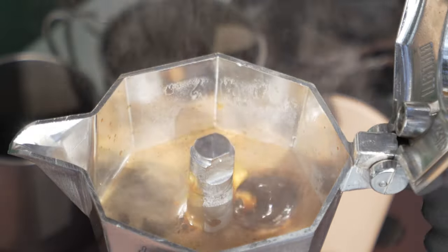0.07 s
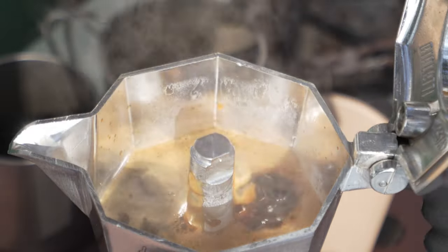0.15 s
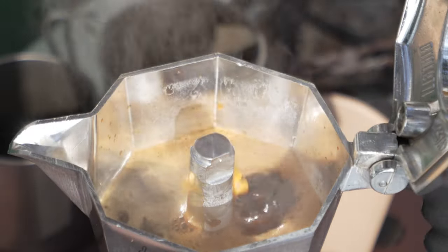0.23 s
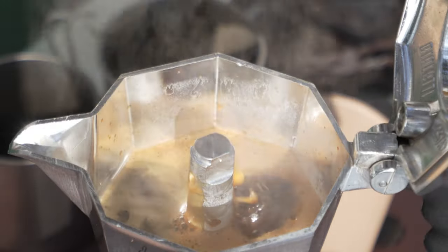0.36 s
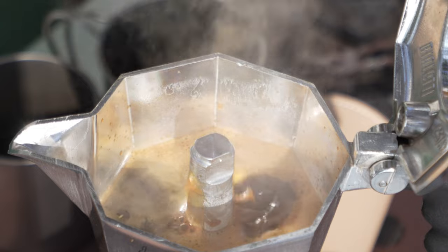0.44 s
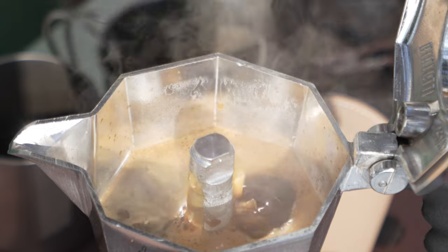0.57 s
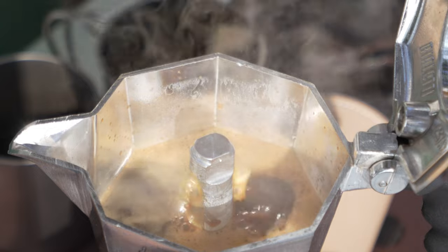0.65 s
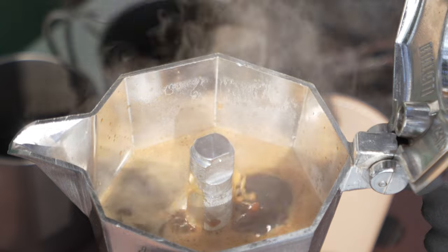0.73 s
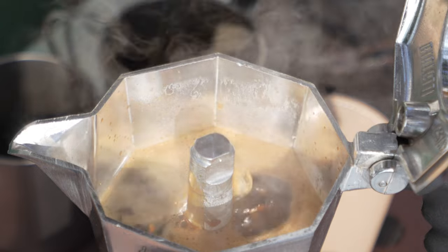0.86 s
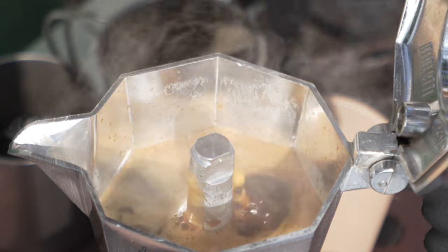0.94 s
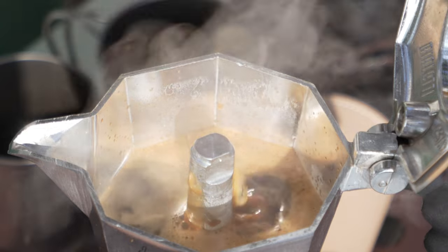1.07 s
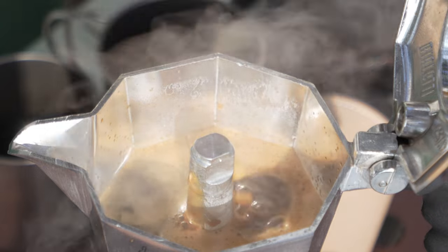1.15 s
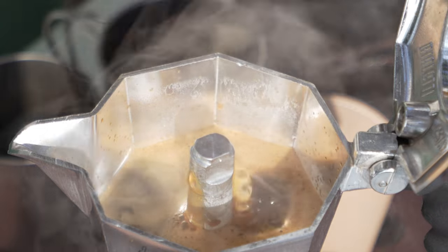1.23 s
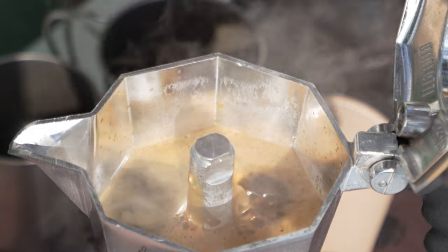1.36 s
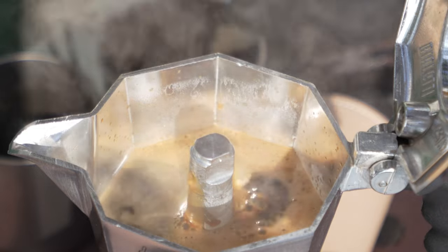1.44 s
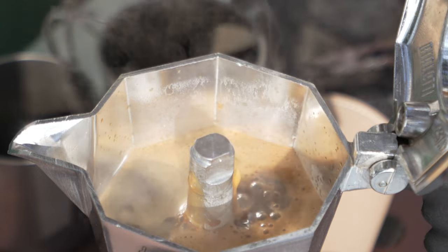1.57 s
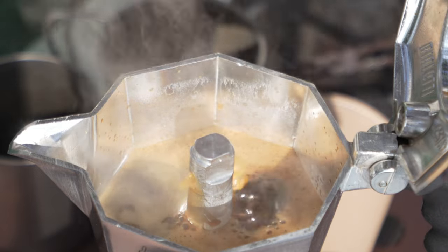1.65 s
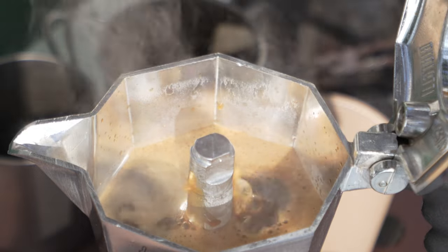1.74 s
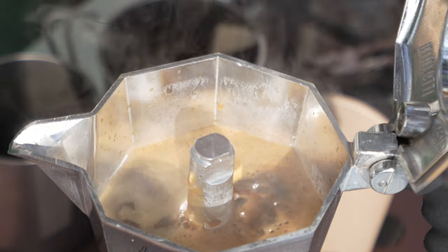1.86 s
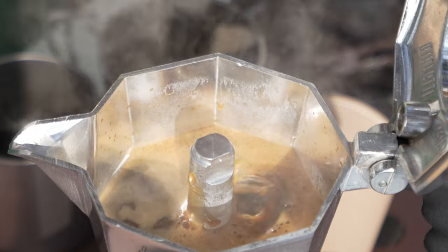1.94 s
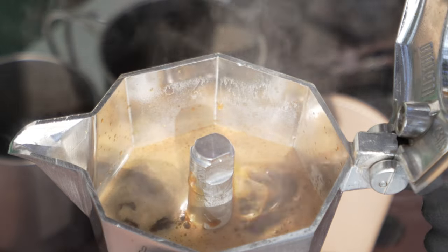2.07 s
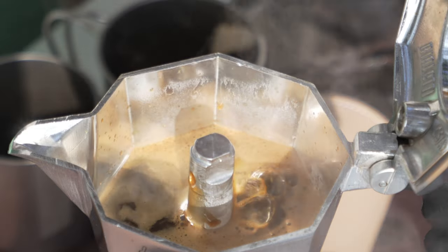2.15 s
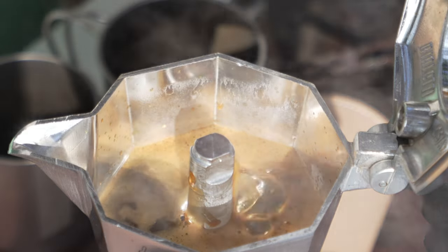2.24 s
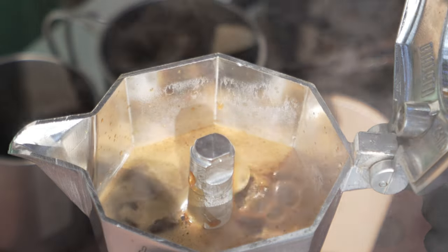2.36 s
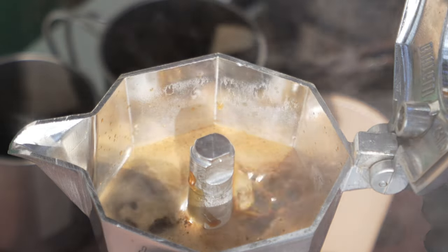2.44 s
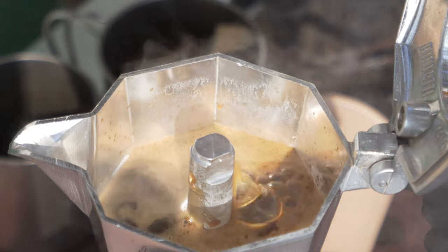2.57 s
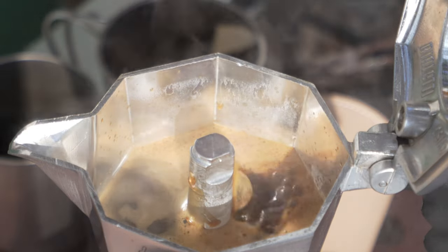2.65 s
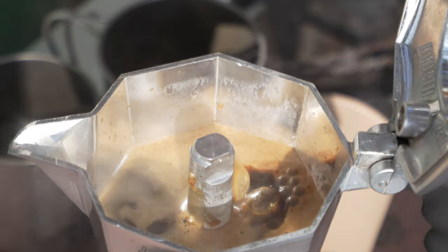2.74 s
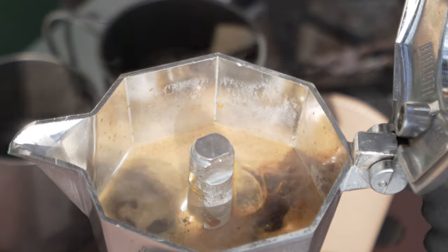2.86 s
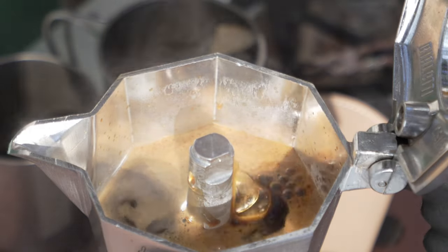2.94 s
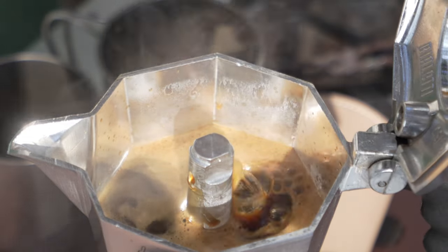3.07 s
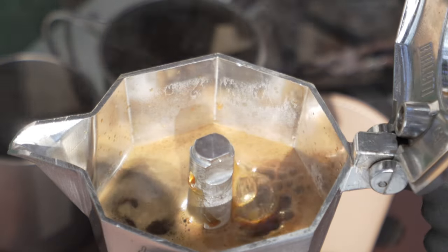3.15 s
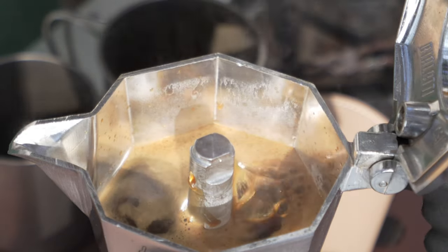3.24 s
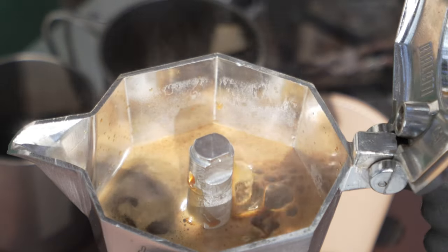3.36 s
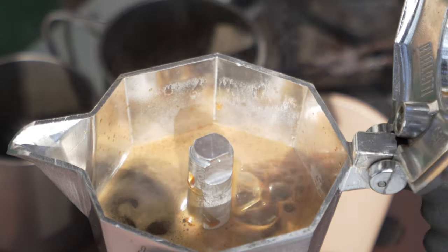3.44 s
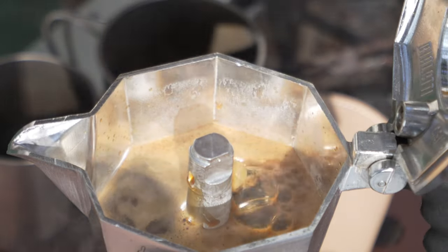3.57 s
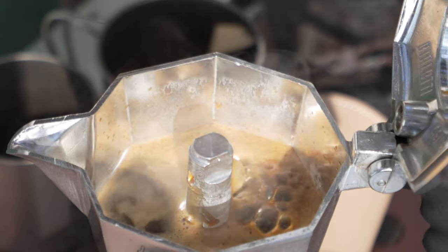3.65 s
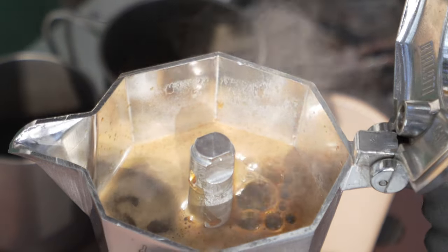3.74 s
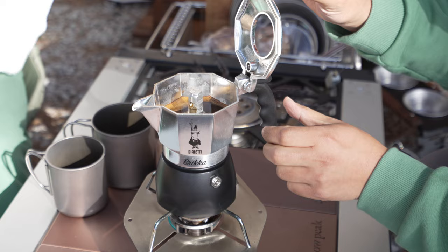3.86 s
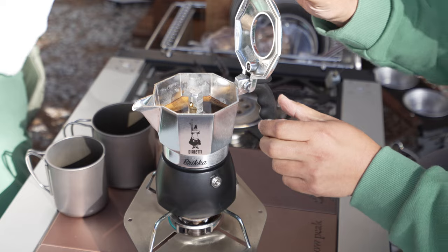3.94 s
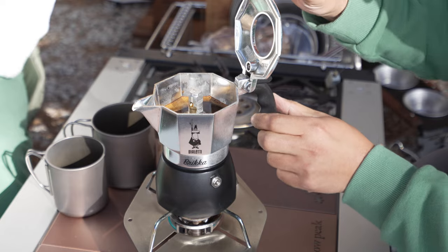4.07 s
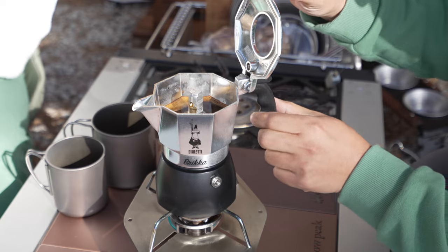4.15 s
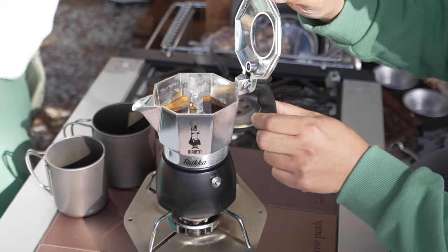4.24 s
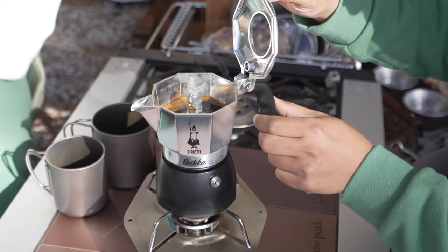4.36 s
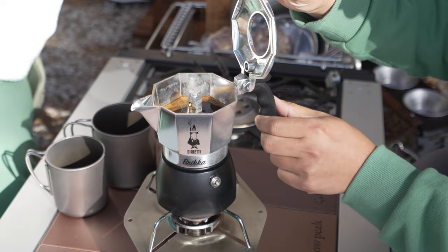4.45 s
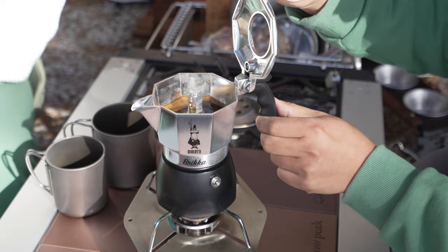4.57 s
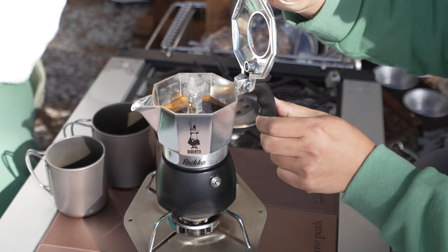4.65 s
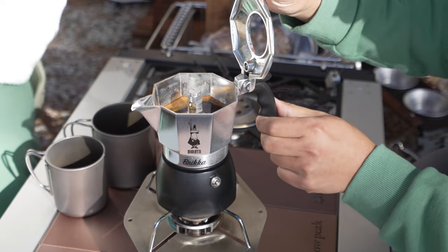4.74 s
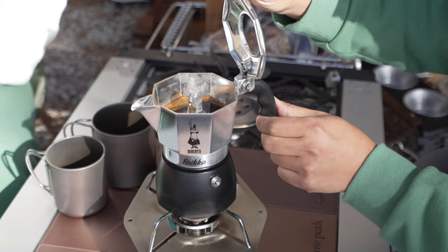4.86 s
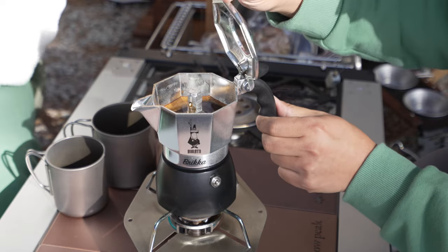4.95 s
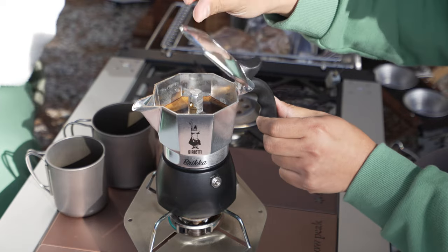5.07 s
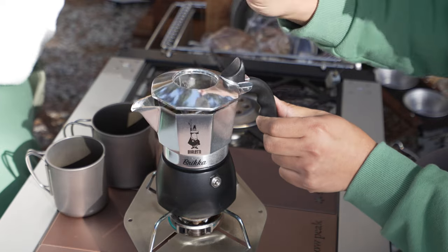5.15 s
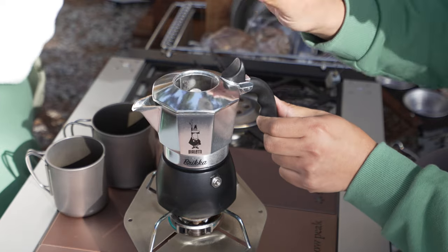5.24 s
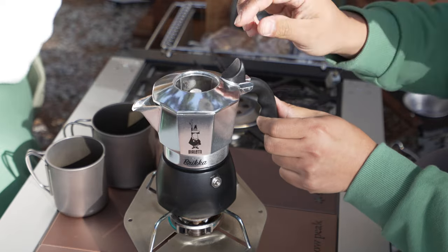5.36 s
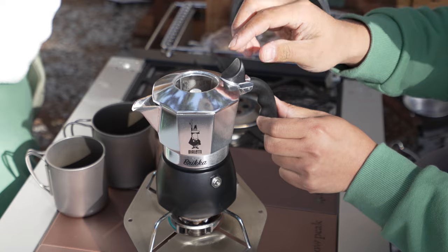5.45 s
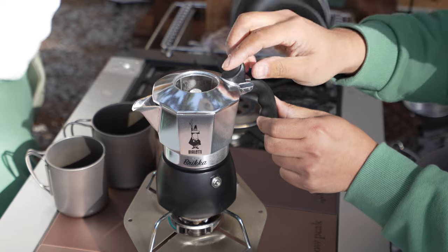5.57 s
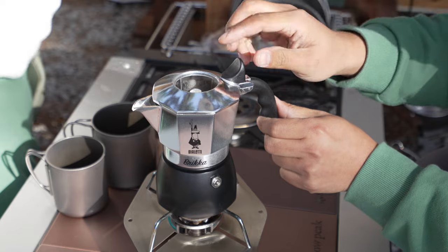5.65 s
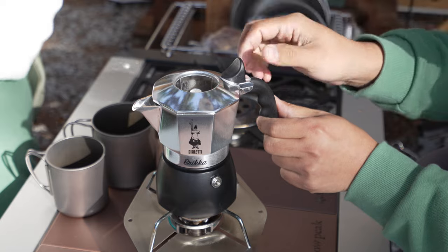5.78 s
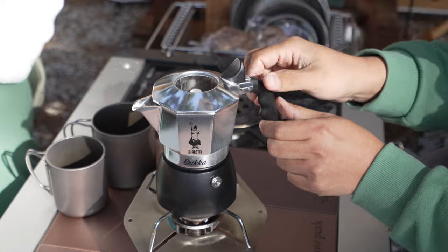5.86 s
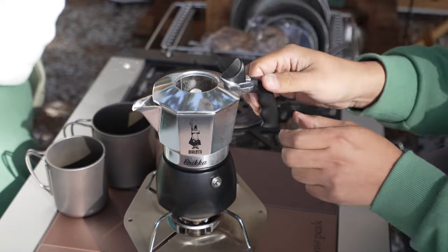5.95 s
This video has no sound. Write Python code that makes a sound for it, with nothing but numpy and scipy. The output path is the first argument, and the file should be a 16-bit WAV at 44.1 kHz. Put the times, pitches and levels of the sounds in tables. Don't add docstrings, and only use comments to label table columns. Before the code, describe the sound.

Close boiling pops and sputtering steam over soft burner roar and wind buffeting, ending with faint steam puffs, hinge ticks and a bright metallic lid clatter.

```python
import sys
import numpy as np
from scipy import signal
from scipy.io import wavfile
from scipy.ndimage import uniform_filter1d

SR = 44100
rng = np.random.default_rng(int(sys.argv[2]) if len(sys.argv) > 2 else 0)


def boost(x):
    u = np.asarray(x, float) / 20
    return 10 ** u


def transcribe(signal):
    frames = np.atleast_2d(signal).T
    limited = np.clip(frames, -1, 1)
    pcm = np.round(limited * 32767).astype(np.int16)
    wavfile.write(sys.argv[1], SR, pcm)


N = 265041

# f/Hz, level/dB per Hz
AIR_COLOUR = [(88, -47), (150, -3.5), (230, -6), (264, -6), (361, -10.5), (523, -7), (773, -9), (996, -9),
              (1210, -10.5), (1860, -15), (2400, -17.5), (3980, -19.5), (5330, -20.5), (6110, -29),
              (9000, -31), (15900, -45)]
# t/s, level/dB
AIR_LEVEL = [(0, -50.5), (3.9, -47.5), (3.92, -47.5), (5.1, -47.5), (5.5, -51.5), (6.01, -47.5)]

# t/s, level/dB
WIND_LEVEL = [(0.0, -44.5), (0.6, -44.5), (0.85, -35.5), (1.04, -44.5), (1.43, -32.5), (1.55, -53),
              (1.65, -38.5), (2.03, -34), (2.67, -50), (2.87, -34.5), (2.98, -49), (3.55, -46.5),
              (3.95, -35), (5.01, -35.5), (5.3, -61), (5.4, -34.5), (5.65, -50.5), (5.99, -43)]
# f/Hz, level/dB per Hz
WIND_COLOUR = [(8.8, -37), (15, 4), (43, 1), (70, 0), (110, -5.5), (221, -23.5), (350, -27), (460, -25),
               (770, -120)]
# t/s, peak/dB, f/Hz, length/ms
GUSTS = [(0.228, -19.5, 62.3, 15), (0.385, -24, 74, 16.4), (0.673, -20.5, 65, 29), (0.898, -27.5, 72, 30),
         (1.106, -27, 76, 16), (1.167, -22.5, 58.4, 28), (1.386, -20, 57.7, 8.8), (1.587, -27.5, 60, 29),
         (1.664, -14, 46, 5.4), (2.005, -19, 59.4, 68), (2.174, -31, 66, 19), (2.34, -27, 66.3, 16),
         (2.812, -26, 70.6, 23), (2.871, -21, 50.5, 29), (2.918, -22.5, 71.5, 14), (3.099, -20.5, 66.6, 12),
         (3.16, -19, 65, 14.5), (3.348, -20, 48.4, 31), (3.886, -23.5, 69.6, 34), (3.965, -31, 53.3, 18),
         (4.018, -23.5, 51.4, 29), (4.083, -30, 64, 14), (4.234, -32, 45.8, 240), (4.549, -24.5, 86, 10.5),
         (4.665, -28, 60.5, 19), (4.733, -18, 56, 6.2), (4.965, -35, 38.2, 26), (5.201, -22.5, 47.6, 5.9),
         (5.397, -39, 54.4, 19), (5.475, -21.5, 64, 20)]

# t/s, peak/dB, f/Hz
HINGE_TICKS = [
    (5.0584, -33, 11700),
    (5.125, -32, 10300),
]
# t/s, peak/dB, crack share/dB, ring time factor/1, rattle tail/dB
LID_BLOWS = [
    (5.2051, -3, -6, 1.05, -33),
    (5.2802, -5.5, -9, 0.9, -36),
    (5.3086, -13, -11, 1.0, -35),
    (5.3248, -15.5, -11, 1.15, -32),
    (5.3355, -24, -11, 1.2, -27),
    (5.3415, -27, -11, 1.1, -27),
]
# f/Hz, level/dB, 60 dB decay/s
LID_MODES = [(860, -6, .014), (985, -4, .014), (1090, -4, .015), (2894, -5, .046), (3650, -12, .04),
             (4640, -12, .03), (5003, -15, .03), (6064, -9, .03), (6900, -13, .03), (8461, -1, .03),
             (8545, -7, .025), (8895, -1, .025), (9745, -11, .022), (10707, -4, .035), (11121, -3, .04),
             (11916, -3, .026), (13100, -7, .012), (14560, -5, .015), (1085, -35, .15), (2830, -31, .15),
             (6729, -35, .3), (8400, -35, .2), (10730, -27, .24), (11130, -33, .26), (11950, -34, .2)]
# f/Hz, level/dB, 60 dB decay/s
LID_FALLING_MODES = [(950, -6, .016), (1066, 2, .022), (1270, -7, .02), (1600, -15, .01), (2894, -6, .035),
                     (4598, -12, .018), (4934, -3, .026), (5909, -11, .022), (6560, -12, .015),
                     (7090, -1, .009), (8393, -8, .033), (9711, -13, .022), (10738, -10, .024),
                     (11108, -10, .028), (11861, -9, .018), (12930, -12, .015), (14110, -12, .015),
                     (14565, -12, .018)]
# body/dB, middle/dB, rim pair/dB, high/dB, top/dB
CONTACT_DB = [
    (0, 0.5, 0, 0, 0),
    (1, -1, 0, 1, 1),
    (-2, -2, 0, 0, -3),
    (0, 2, -5, -1, -8),
    (0, 3, -9, -11, -20),
    (-2, 3, -9, -11, -20),
]
CONTACT_HZ = [1000, 4000, 8700, 11500, 14500]

# start t/s, peak/dB, attack/s, hold/s, release/s
SPURTS = [
    (4.059, -41, 0.049, 0.12, 0.13),
    (4.363, -43.5, 0.078, 0.1, 0.074),
]
# f/Hz, level/dB per Hz
SPURT_COLOURS = [
    [(1290, -43), (2200, -26), (2770, 0.5), (3640, -6), (3960, 3.5), (4870, -12), (5380, -4), (8550, -3.5),
     (9920, -8), (15900, -11)],
    [(1290, -46), (2200, -19), (3220, -1), (4480, -4.5), (4950, -12), (5650, -6.5), (8480, -2.5),
     (10500, -18.5), (12300, -5), (15900, -15)],
]
TABLE_ECHO_S = [.001515, .001575]

# t/s, level/dB, top band against it/dB (how sharp the jet is)
JET = [(0, -46, -9.5), (.6, -44, -9.5), (.76, -43.5, -18), (.95, -44.5, -13.5), (1.3, -44.5, -13),
       (1.35, -43.5, -9), (1.77, -42, -9.5), (1.87, -38.5, -6), (1.96, -42.5, -10), (2.12, -56, -16),
       (2.19, -50.5, -16), (2.34, -56, -13), (2.64, -49.5, -16), (2.69, -45.5, -18), (2.88, -45.5, -14),
       (2.92, -47.5, -4), (3.4, -47, -2.5), (3.88, -49, -7)]
# f/Hz, level/dB per Hz
JET_DRY = [(5000, -63), (5700, -2.5), (6400, 8.5), (7300, 11.5), (8100, -2), (9000, -5), (10700, -4),
           (11700, -9.5), (12700, -11), (14300, -10), (15000, -9), (15900, -10)]
# f/Hz, level/dB per Hz
JET_WET = [(5000, -47), (5700, -2), (6100, 13.5), (7000, 6.5), (8200, 16.5), (8400, -4), (9300, -3),
           (10800, -3), (11500, -7), (12500, -10), (13300, 4), (14200, 2), (15200, 1), (15900, 4)]
# t/s, share 0-1/1, sputter depth/dB
WETNESS = [
    (0, 0.1, -1.7),
    (1.9, 0.1, 1),
    (2.1, 0.9, 4),
    (2.9, 0.7, -1),
    (3.9, 0.75, 1),
]
# start t/s, end t/s, start f/Hz, end f/Hz, level/dB
SPOUT_SHIFTS = [(0, 1.33, 12240, 12300, -12), (1.33, 1.96, 12450, 12420, -7), (0, 1.33, 13720, 13850, -5),
                (0, 1.55, 13110, 13150, -6), (1.56, 1.86, 13600, 13450, -7), (1.33, 1.6, 11900, 11900, 3),
                (1.83, 1.97, 12900, 13100, 5), (2.0, 2.68, 12150, 11400, -6), (2.6, 3.2, 13750, 13200, -9),
                (3.2, 3.9, 11550, 11480, -8), (2.1, 3.9, 9250, 9400, -5), (3.2, 3.88, 14200, 14500, 5),
                (2.9, 3.2, 14900, 14500, 3), (2.66, 2.9, 5900, 6600, 6), (3.2, 3.9, 12300, 12600, 2),
                (2.05, 2.45, 13000, 13300, -5), (2.05, 2.9, 14200, 14300, 2),
                (2.05, 2.62, 13600, 13750, -5), (2.9, 3.9, 8500, 8600, -2), (3.2, 3.88, 13500, 13700, 2)]
# t/s, peak/dB, centre f/Hz
SPITS = [(1.6826, -31, 6590), (1.8074, -31, 6560), (1.9371, -25, 6800), (2.0259, -33, 7400),
         (2.1117, -44, 7930), (2.1635, -34.5, 8100), (2.2239, -36, 8200), (2.2489, -31.5, 8100),
         (2.2888, -42, 7470), (2.3771, -33.5, 7740), (2.4155, -36, 8000), (2.4339, -38, 6150),
         (2.4654, -33.5, 6200), (2.5542, -33.5, 6760), (2.6055, -46, 7710), (2.6225, -44, 6100),
         (2.6624, -32, 6310), (2.6998, -24.5, 6360), (2.7442, -33, 6030), (2.9393, -36, 7620),
         (2.9642, -27, 7940), (3.044, -37, 7780), (3.079, -39, 7610), (3.1423, -40, 7820),
         (3.2331, -35, 7430), (3.4057, -28, 7290), (3.4621, -37, 7420), (3.4925, -39, 7960),
         (3.5519, -30, 8000), (3.6098, -33, 8020), (3.6432, -33, 8190), (3.6746, -29, 8200),
         (3.7235, -34, 5970), (3.7679, -39, 8170), (3.8083, -39, 7950), (3.8392, -42, 6090),
         (3.8662, -29, 8000), (3.9001, -47, 8250)]
# t/s, peak/dB, centre f/Hz
SPLASHES = [(1.9777, -31, 3440), (2.067, -26, 3300), (2.0904, -27, 3350), (2.2046, -31, 3450),
            (2.3817, -32, 3570), (2.6142, -26, 3340), (2.724, -30, 3390), (2.7599, -29, 3340),
            (2.7948, -31, 3450), (2.8187, -28, 3560), (2.8936, -31, 3410), (2.9759, -34, 3500),
            (2.9998, -29, 3600), (3.0208, -25.5, 3300), (3.0557, -33, 3300), (3.0841, -30, 3380),
            (3.1201, -23, 4150), (3.1555, -23.5, 3430), (3.1809, -21, 3400), (3.2453, -28, 3400),
            (3.3136, -25, 3380), (3.3421, -27, 3510), (3.4817, -26, 3450), (3.5157, -24, 3400),
            (3.5391, -35, 3380), (3.5665, -19, 3310), (3.5965, -17.5, 3450), (3.6254, -29, 3320),
            (3.7975, -32, 3500), (3.8449, -28, 3400)]
# t/s, peak/dB
FLICKS = [(1.808, -22), (2.0393, -31), (2.174, -31), (2.9642, -25), (2.9763, -20), (3.4062, -28)]

# t/s, level/dB
CUP = [(0.0, -32.5), (0.54, -32.5), (0.97, -34.5), (1.94, -34.5), (1.99, -32.5), (2.23, -40), (2.27, -35.5),
       (3.3, -31.5), (3.38, -33.5), (3.81, -32.5), (3.84, -31), (3.9, -33.5)]
# f/Hz, level/dB per Hz
CUP_DEEP = [(290, -23), (500, -24.5), (657, -14.5), (812, -13), (984, -36), (1130, -1.5), (1290, 2),
            (1660, -6.5), (2140, -6.5), (2490, -17.5), (2930, -32.5), (3340, -26.5), (3810, -41),
            (4620, -47), (5600, -36.5), (7280, -69), (12300, -120)]
# f/Hz, level/dB per Hz
CUP_FULL = [(290, -16.5), (500, -28.5), (582, -18.5), (670, -33), (764, -19), (1010, -42), (1220, -4),
            (1290, -3), (1960, 3), (2370, -3.5), (2760, 8), (2960, 2.5), (3380, 7), (3890, -2.5),
            (5600, -19), (7280, -70), (12300, -120)]
# t/s, share 0-1/1
FILL = [(0, 0), (1.2, 0.2), (1.9, 0.29), (2.1, 0.42), (2.8, 0.7), (3.9, 1)]
# t/s, splash gain/dB, width/s
SURGES = [(1.5, -15, .05), (1.86, -13, 0.11), (1.98, 12, 0.037), (2.2, 3, 0.067), (2.56, -0.5, 0.053),
          (2.78, 7, 0.16), (3.14, 7.5, 0.054), (3.37, 8.5, 0.035), (3.61, 4, 0.043), (3.019, 11, 0.014)]
# t/s, level/dB
RIM_DIP = [(1.95, -1), (2.1, -11), (2.62, -12), (2.7, 3), (2.88, 4), (2.93, -7), (3.9, 0)]
# t/s, peak/dB, f/Hz
POPS = [(0.0267, -11.5, 1390), (0.0523, -15, 1500), (0.077, -14.5, 1330), (0.0947, -15, 1330),
        (0.15, -26, 1300), (0.176, -16.5, 1470), (0.2748, -28, 1290), (0.302, -14.5, 1370),
        (0.3636, -31, 1290), (0.386, -18, 1290), (0.4212, -17, 1270), (0.4833, -17, 1290),
        (0.516, -24, 1340), (0.5287, -18, 1310), (0.5477, -14, 1280), (0.5854, -15, 1220),
        (0.6419, -17, 1270), (0.6654, -28, 1340), (0.7138, -24, 1260), (0.7622, -18, 1310),
        (0.82, -17, 1350), (0.8745, -22, 1320), (0.9093, -21, 1270), (0.9627, -34, 1280),
        (1.027, -26, 1380), (1.051, -26, 1340), (1.085, -29, 1470), (1.103, -19, 1300), (1.194, -15, 1260),
        (1.2511, -20, 1230), (1.3188, -18, 1380), (1.4418, -17.5, 1250), (1.4968, -24, 1330),
        (1.69, -20, 1430), (1.8164, -23, 1310), (1.9131, -28, 1410)]
# t/s, peak/dB, f/Hz
LATE_POPS = [(2.0811, -24, 2000), (2.2433, -30, 1460), (2.4847, -25, 1320), (2.8404, -35, 1650),
             (2.8689, -20, 2190), (2.9187, -19, 2060), (3.1512, -20, 1810), (3.3044, -18, 2000),
             (3.4396, -27, 2000), (3.5149, -18, 1810), (3.6321, -16, 2080), (3.7773, -31, 1440),
             (3.891, -21, 1860)]
# t/s, peak/dB, f/Hz
GLUGS = [(0.186, -27, 789), (0.264, -37, 735), (0.301, -37, 794), (0.446, -33, 842), (0.477, -36, 676),
         (0.585, -33, 813), (0.645, -27, 650), (1.195, -26, 826), (1.264, -29, 797), (1.314, -23, 790)]

CUT_S = 3.913
SOFT_DB, SOFT_HZ = -21, 6500
CHATTER_DB, CRACK_HZ, CRACK_T60_S = 1.8, 2400, 0.012
SCRAPE_S, SCRAPE_DB = 0.01, -40
SPURT_QUIET_DB, SPURT_SAG_DB = -27, -5
TABLE_ECHO, ECHO_DRIFT = 0.83, 0.037
MIDDLE_DB, MIDDLE_SHARE = -1.5, 0.31
GAP_DB, GAP_SHARE, GAP_WET_DB = -13, 0.26, 10
SHIFT_WIDTH_HZ, RIDGE_WIDTH_HZ, SHIFT_FADE_S = 210, 600, 0.03
FLOOD_S, FLOOD_RISE_S = 1.8, 0.069
GURGLE_DB, GURGLE_FILL_DB = -12.5, -18.5
UPPER_DB, UPPER_FILL_DB, UPPER_FLOOD_DB = -20, 6, 8.5
SPLASH_DB, SPLASH_FLOOD_DB, SURGE_UPPER = -24, 7, 0.3
RIM_DIP_HZ, RIM_DIP_WIDTH_HZ = 5400, 450
POP_TRIM_DB, POP_T60_S, POP_RISE_S = 3, 0.02, 0.00083
DUCK_S, DUCK_DB, DUCK_FALL_S, DUCK_RECOVER_S = 5.216, -9, 0.0066, 0.049
EDGE_HZ = 15800


def evened(x):
    return x / np.sqrt(np.mean(x ** 2) + 1e-20)


def read(points, hz):
    f, value = np.transpose(points)
    return np.interp(np.log(hz + 1), np.log(f + 1), value)


def columns(rows, t):
    s, *cols = np.transpose(rows)
    return [np.interp(t, s, c) for c in cols]


def add(mix, s, sound):
    part = mix[max(round(s * SR), 0):][:len(sound)]
    part += sound[:len(part)]


def fading(db, t, t60_s):
    return boost(db - 60 * t / t60_s)


def bell(x, centre, width):
    return np.exp(-((x - centre) / width) ** 2)


def wobble(hz):
    low_pass = signal.butter(2, hz, fs=SR, output="sos")
    slow = evened(signal.sosfilt(low_pass, rng.standard_normal(N)))
    return np.clip(slow, -2, 2)


def colour(x, field, size=512):
    hop = size // 4
    hz, t, z = signal.stft(x, SR, nperseg=size, noverlap=size - hop)
    return signal.istft(z * boost(field(hz, t)), SR, nperseg=size, noverlap=size - hop)[1][:N]


def banded(colour_db, hz, bands, levels_db):
    lift = []
    for (lo, hi), db in zip(bands, levels_db):
        inside = colour_db[(hz >= lo) & (hz < hi)]
        power = (boost(inside) ** 2).sum(0) / len(hz)
        lift.append(db - 10 * np.log10(power))
    place = np.interp(hz, np.ravel(bands), np.repeat(np.arange(len(bands)), 2))
    for k, band_lift in enumerate(lift):
        colour_db = colour_db + np.maximum(1 - abs(place - k), 0)[:, None] * band_lift
    return colour_db


def blend(a, b, share, hz):
    return read(a, hz)[:, None] * (1 - share) + read(b, hz)[:, None] * share


def bursts(per_s, spread_db):
    draw = rng.random((N, 3))
    size = boost(-spread_db * np.log(np.maximum(draw[:, 0], 0.004)))
    sign = np.sign(draw[:, 1] - 0.5)
    return evened(size * sign * (draw[:, 2] < per_s / SR))


def air():
    floor = colour(rng.standard_normal(N), lambda hz, s: read(AIR_COLOUR, hz)[:, None] + 0 * s, size=1024)
    level_db = columns(AIR_LEVEL, np.arange(N) / SR)[0] + 0.16 * wobble(14)
    return boost(level_db) * evened(floor)


def wind():
    t = np.arange(N) / SR
    rumble = colour(rng.standard_normal(N), lambda hz, s: read(WIND_COLOUR, hz)[:, None] + 0 * s, size=4096)
    lumpy = evened(evened(rumble) * boost(3.4 * wobble(11)))
    out = boost(columns(WIND_LEVEL, t)[0] - 1.0) * lumpy
    u = np.arange(-3000, 3000) / SR
    for (s, db, hz, ms), phase in zip(GUSTS, rng.random((len(GUSTS), 1))):
        turn = 2 * np.pi * (hz * u + phase)
        swing = np.sin(turn) + 0.25 * np.sin(2 * turn) + 0.091 * np.sin(3 * turn)
        add(out, s + u[0], boost(db) * bell(u, 0, ms * 0.00045) * swing)
    return out


def lid():
    out, t = np.zeros(N), np.arange(10000) / SR
    high_pass = signal.butter(5, 820, "highpass", fs=SR)
    crack_pass = signal.butter(2, CRACK_HZ, "highpass", fs=SR)
    dull = signal.butter(2, 9000, fs=SR)
    for k, (s, db, crack_db, ring, tail_db) in enumerate(LID_BLOWS):
        table = LID_MODES if k else LID_FALLING_MODES + LID_MODES[-7:]
        hz, mode_db, t60 = np.transpose(table)[:, :, None]
        struck_db = np.interp(hz, CONTACT_HZ, CONTACT_DB[k]) + 1.5 * rng.standard_normal(hz.shape)
        chatter = evened(uniform_filter1d(rng.standard_normal((len(hz), len(t))), size=90))
        loudness = fading(mode_db + struck_db + CHATTER_DB * chatter, t, t60 * ring)
        modes = (loudness * np.sin(2 * np.pi * hz * t)).sum(0)
        crack = signal.lfilter(*dull, rng.standard_normal(len(t))) * fading(crack_db, t, CRACK_T60_S)
        crack = signal.lfilter(*crack_pass, crack)
        rattle = 0.61 * signal.lfilter(*dull, rng.standard_normal(len(t)))
        rattle = (rattle + 0.21 * rng.standard_normal(len(t))) * fading(tail_db, t, 0.63)
        blow = signal.lfilter(*high_pass, -modes / abs(modes).max() + crack + rattle)
        if db < SOFT_DB:
            blow = signal.lfilter(*signal.butter(2, SOFT_HZ, fs=SR), blow)
        add(out, s + 0.00046, boost(db) * blow / abs(blow).max())
    rub = np.arange(round(SCRAPE_S * SR)) / (SCRAPE_S * SR)
    for s, *_ in LID_BLOWS[:2]:
        scrape = np.diff(rng.standard_normal(len(rub)), prepend=0)
        add(out, s - SCRAPE_S, boost(SCRAPE_DB) * rub ** 2 * scrape)
    for s, db, hz in HINGE_TICKS:
        band = signal.butter(2, [hz * 0.82, hz * 1.15], "bandpass", fs=SR)
        tick = evened(signal.lfilter(*band, rng.standard_normal(len(t))))
        add(out, s, fading(db - 10.5, t, 0.026) * tick)
    return out


def spurts():
    out = np.zeros(N)
    for (s, db, attack, hold, release), tint, delay in zip(SPURTS, SPURT_COLOURS, TABLE_ECHO_S):
        times = s + np.cumsum([0, attack, hold, release])
        levels_db = db + np.array([SPURT_QUIET_DB, 0, SPURT_SAG_DB, SPURT_QUIET_DB])

        def field(hz, t):
            late = delay * (1 + ECHO_DRIFT * (t - s))
            echo = TABLE_ECHO * np.exp(2j * np.pi * hz[:, None] * late)
            comb_db = 20 * np.log10(abs(1 + echo))
            level_db = np.interp(t, times, levels_db)
            shape = banded(read(tint, hz)[:, None] + comb_db, hz, [(2500, 15500)], [level_db])
            return shape - 80 * ((t < times[0]) | (t > times[-1]))
        out += colour(rng.standard_normal(N) * boost(0.9 * wobble(40)), field)
    return out


def slugs(frames):
    turns = np.cumsum(27 * (1 + 0.5 * wobble(8.12))) / SR
    return np.sin(2 * np.pi * turns)[np.minimum(np.arange(frames) * 128, N - 1)]


def jet():
    hiss = rng.standard_normal(N) + 0.3 * bursts(per_s=900, spread_db=2.6)
    drive = evened(hiss * boost(2.3 * wobble(115)))
    frames = N // 128 + 9
    patches = uniform_filter1d(rng.standard_normal((frames, 257)), size=12, axis=0)
    patches = evened(uniform_filter1d(patches, size=14, axis=1)).T
    chop = slugs(frames)

    def field(hz, t):
        db, top_db = columns(JET, t)
        wet, depth_db = columns(WETNESS, t)
        middle_db = MIDDLE_DB + MIDDLE_SHARE * top_db
        gap_db = GAP_DB + GAP_SHARE * top_db + GAP_WET_DB * wet
        bands = [(5900, 8400), (8600, 11400), (12400, 13800), (14000, 15700)]
        levels_db = [db, db + middle_db, db + gap_db, db + top_db]
        shape = banded(blend(JET_DRY, JET_WET, wet, hz), hz, bands, levels_db)
        for s0, s1, hz0, hz1, shift_db in SPOUT_SHIFTS:
            present = np.clip(np.minimum(t - s0, s1 - t) / SHIFT_FADE_S + 0.5, 0, 1)
            centre = np.interp(t, [s0, s1], [hz0, hz1])
            width = SHIFT_WIDTH_HZ if shift_db < 0 else RIDGE_WIDTH_HZ
            shape = shape + shift_db * present * bell(hz[:, None], centre, width)
        reach = 0.25 + 2.0 * bell(hz, 7600, 1500)[:, None]
        throb_db = reach * depth_db * (chop[:len(t)] - 0.3)
        return shape + throb_db + 1.84 * patches[:, :len(t)]
    out = colour(drive, field)
    t = np.arange(900) / SR
    puffs = rng.standard_normal((len(SPITS + SPLASHES), len(t)))
    for (s, db, hz), puff in zip(SPITS + SPLASHES, puffs):
        band = signal.butter(2, [hz * 0.95, min(hz * 1.06, SR * 0.45)], "bandpass", fs=SR)
        spit = evened(signal.lfilter(*band, puff))
        add(out, s, fading(db - 7, t, 0.07) * spit * np.minimum(t / 0.00074, 1))
    for (s, db), puff in zip(FLICKS, rng.standard_normal((len(FLICKS), len(t)))):
        bright = evened(np.diff(puff, 2, prepend=[0, 0]))
        add(out, s, fading(db - 4.5, t, 0.033) * bright)
    return out


def cup():
    froth = rng.standard_normal(N) * boost(1.3 * wobble(130))
    drive = 0.64 * bursts(per_s=900, spread_db=3.0) + 0.86 * evened(froth)
    drive = evened(drive * boost(1.3 * wobble(120)))
    lumps_db = 4.2 * wobble(70)

    def field(hz, t):
        db, fill = columns(CUP, t)[0], columns(FILL, t)[0]
        flood = np.clip((t - FLOOD_S) / FLOOD_RISE_S, 0, 1)
        surge_db = sum(gain * np.exp(-((t - s) / width) ** 4) for s, gain, width in SURGES)
        lump_db = columns(WETNESS, t)[0] * np.interp(t * SR, np.arange(N), lumps_db)
        low_db = GURGLE_DB + GURGLE_FILL_DB * fill
        upper_db = UPPER_DB + UPPER_FILL_DB * fill + UPPER_FLOOD_DB * flood
        upper_db = upper_db + SURGE_UPPER * surge_db + 0.9 * lump_db
        splash_db = SPLASH_DB + SPLASH_FLOOD_DB * flood + surge_db + lump_db - 2.5
        bands = [(550, 950), (1100, 2500), (2600, 4000), (4100, 5700)]
        levels_db = [db + low_db, db, db + upper_db, db + splash_db]
        shape = banded(blend(CUP_DEEP, CUP_FULL, fill, hz), hz, bands, levels_db)
        dip_db = (t > RIM_DIP[0][0]) * columns(RIM_DIP, t)[0]
        return shape + dip_db * bell(hz[:, None], RIM_DIP_HZ, RIM_DIP_WIDTH_HZ)
    out = colour(drive, field, size=1024)
    t = np.arange(600) / SR
    for s, db, hz in POPS + LATE_POPS + GLUGS:
        tone = np.sin(2 * np.pi * hz * t * (1 + 8 * t))
        add(out, s, fading(db - POP_TRIM_DB, t, POP_T60_S) * tone * np.minimum(t / POP_RISE_S, 1))
    return out


def scene():
    t = np.arange(N) / SR
    close = np.clip((CUT_S - t) / 0.013, 0, 1)
    splice = np.clip(abs(t - CUT_S) / 0.011, 0, 1)
    return (close * (cup() + jet()) + splice * (wind() + air()) + spurts() + lid())[None]


def roll_off(x):
    return signal.sosfilt(signal.butter(12, 16670, fs=SR, output="sos"), x)


def record(dry):
    since = np.arange(N) / SR - DUCK_S
    clamp = since / DUCK_FALL_S
    let_go = 1 - (since - DUCK_FALL_S) / DUCK_RECOVER_S
    ducked = dry * boost(DUCK_DB * np.clip(np.minimum(clamp, let_go), 0, 1))
    edge = signal.firwin(511, EDGE_HZ, window=("kaiser", 9), fs=SR)[None]
    return roll_off(signal.oaconvolve(ducked, edge, "same"))


dry = scene()
out = record(dry)
transcribe(out)
```